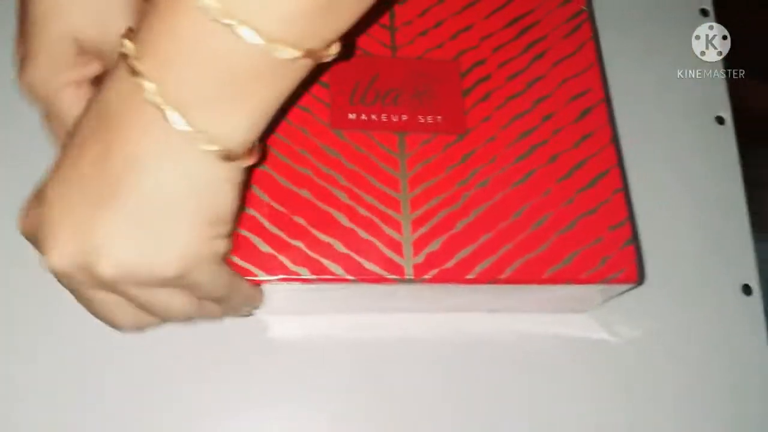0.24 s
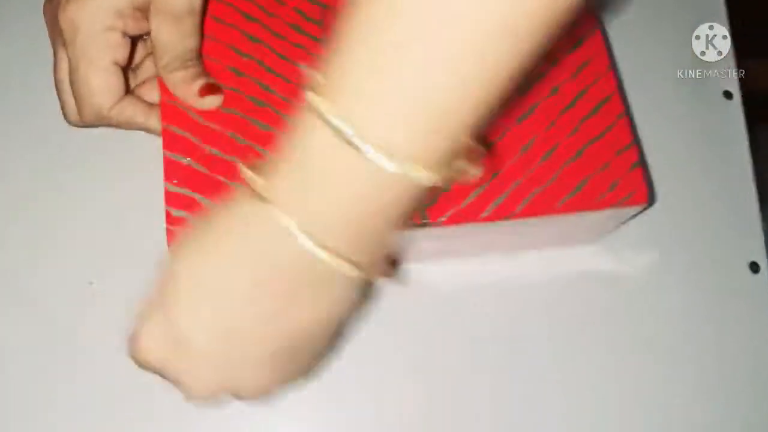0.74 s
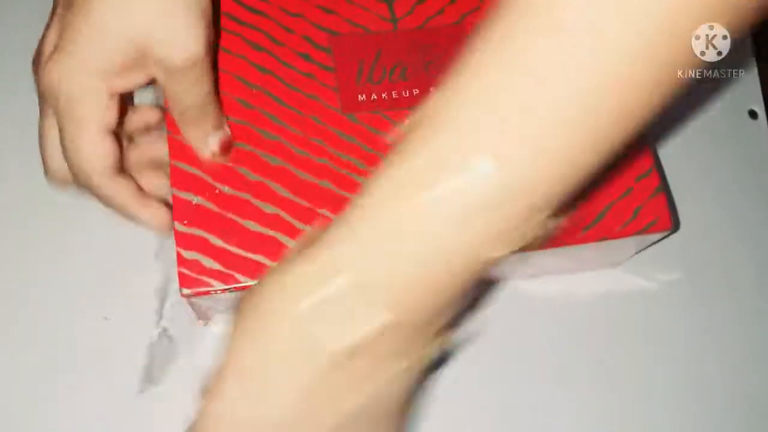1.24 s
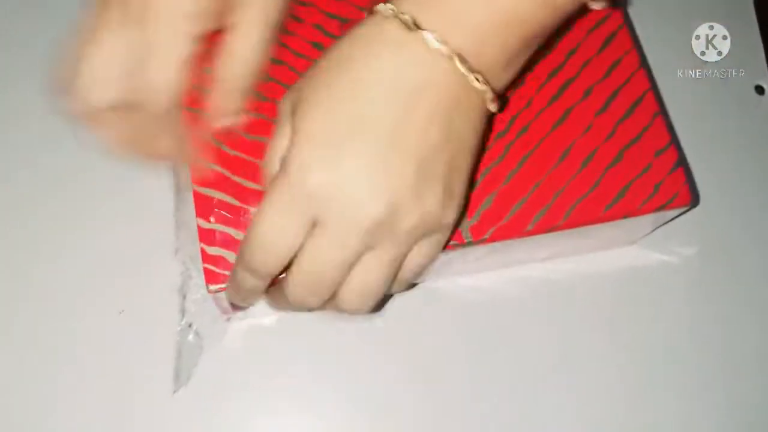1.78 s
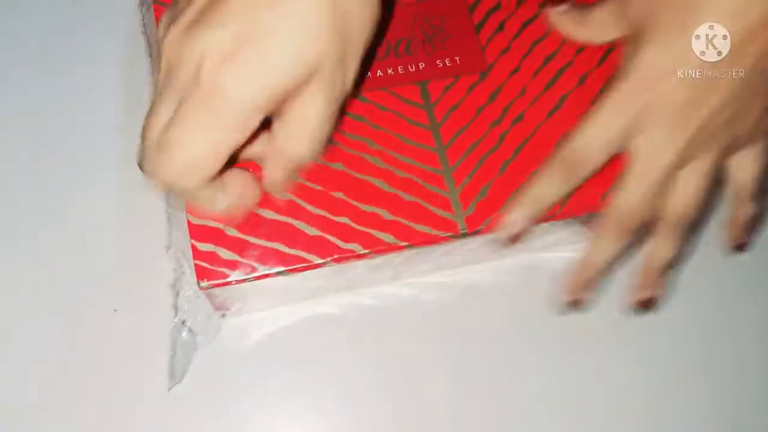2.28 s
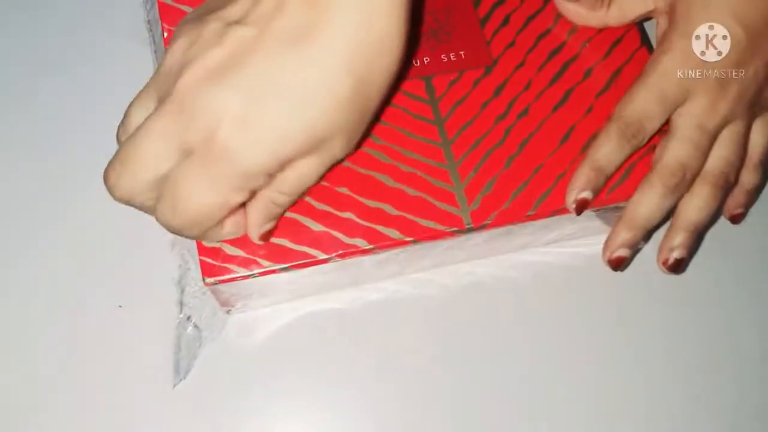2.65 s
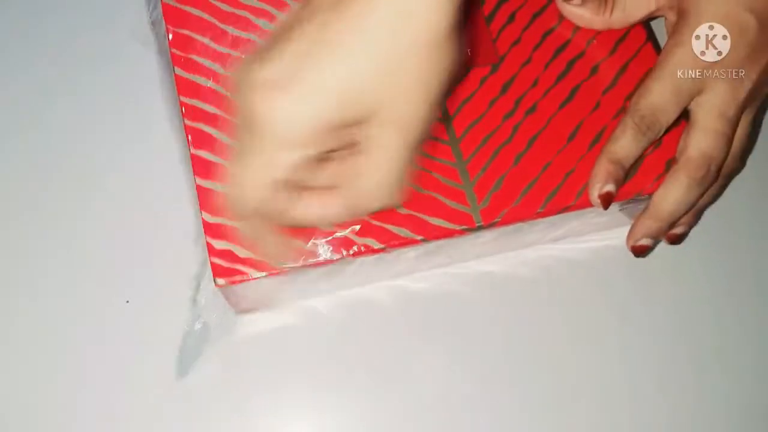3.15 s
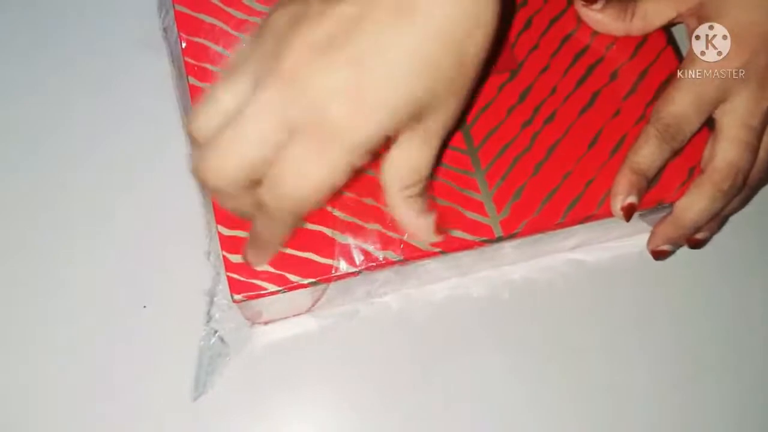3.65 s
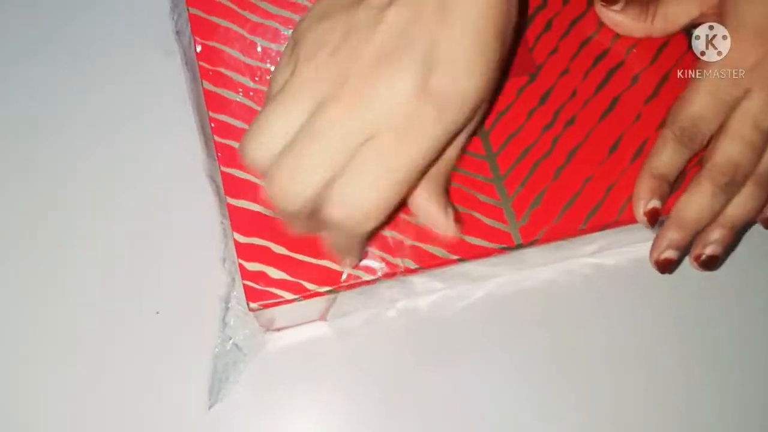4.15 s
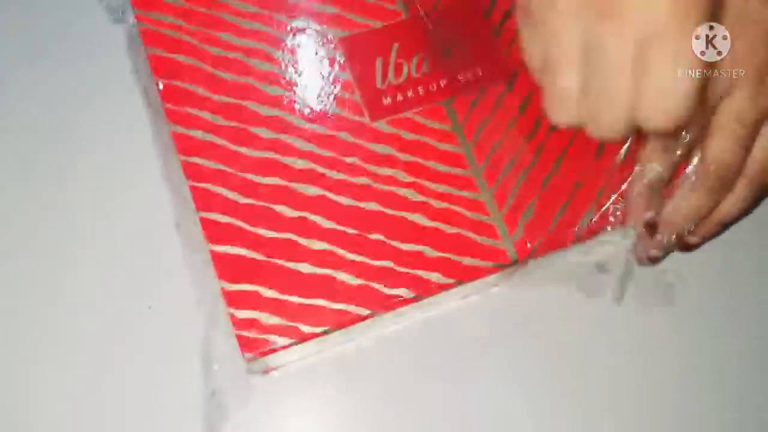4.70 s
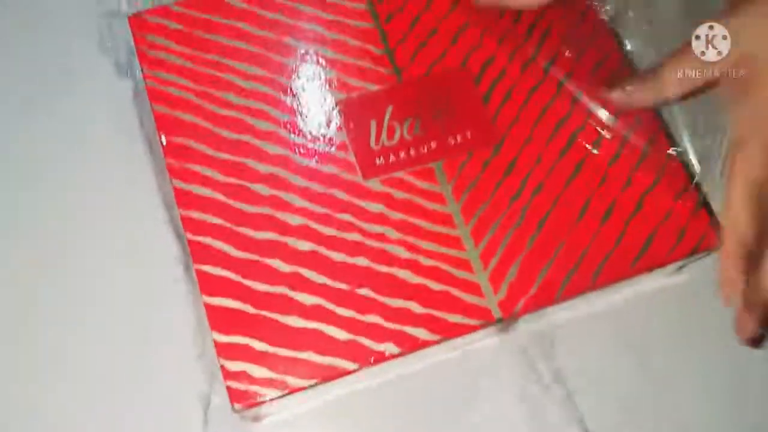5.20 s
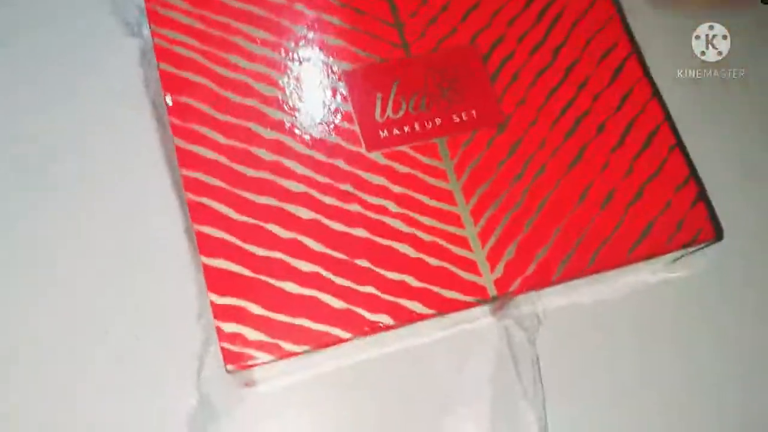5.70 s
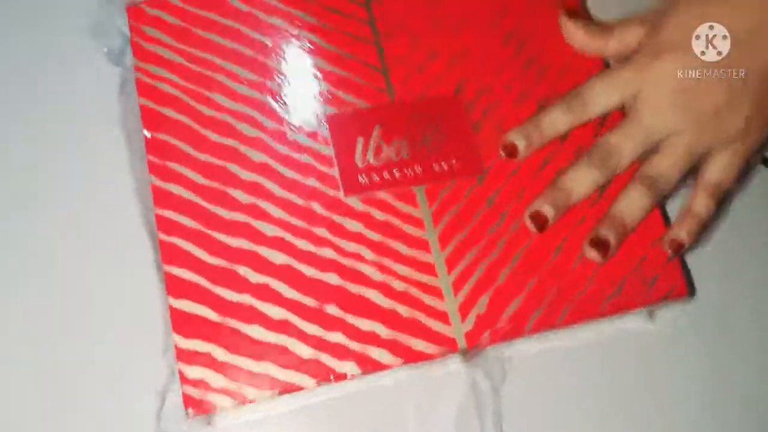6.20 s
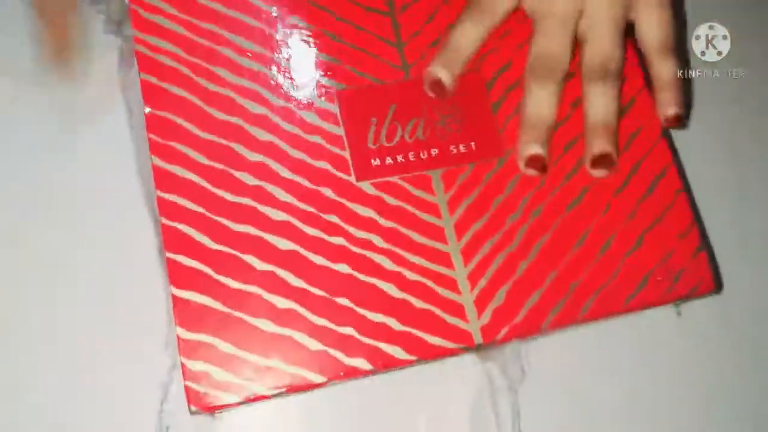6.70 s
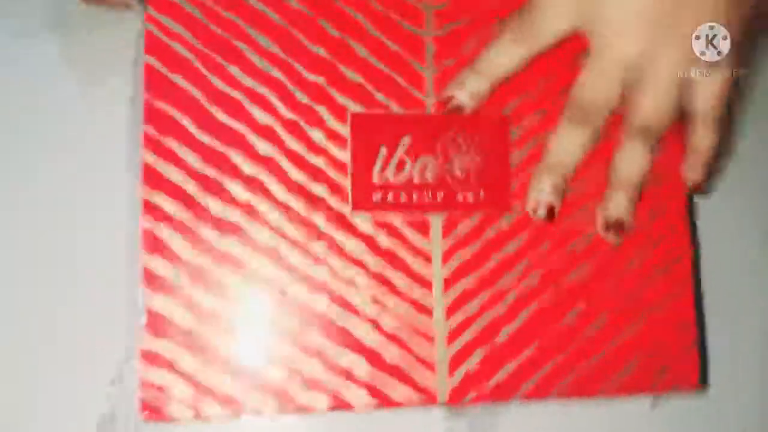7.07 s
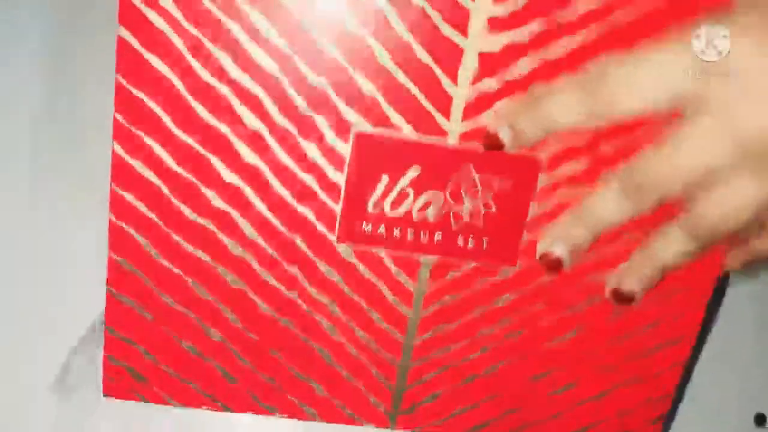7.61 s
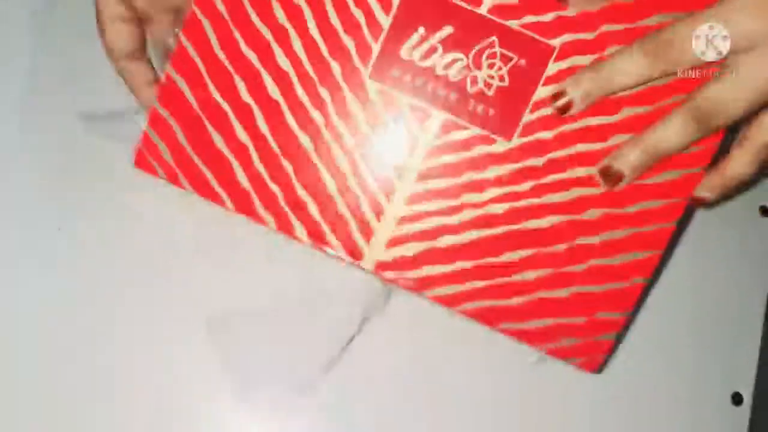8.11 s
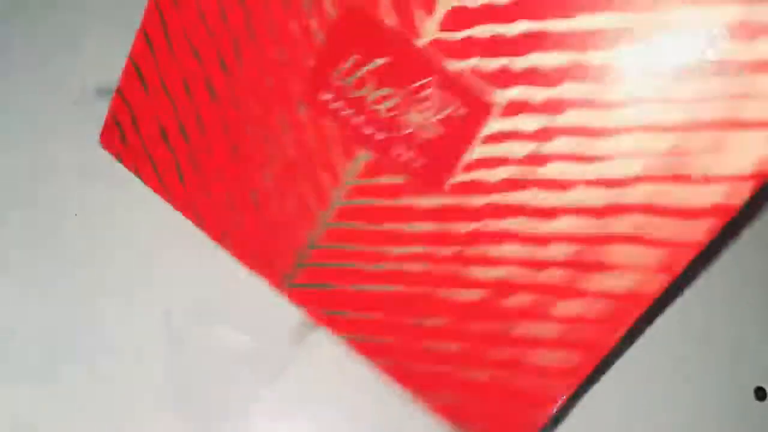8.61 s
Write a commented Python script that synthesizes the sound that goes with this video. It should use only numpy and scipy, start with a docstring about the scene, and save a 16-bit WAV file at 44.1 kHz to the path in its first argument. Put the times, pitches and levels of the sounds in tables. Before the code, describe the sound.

Close, crackly plastic film is picked at and peeled off a cardboard box, with soft hollow thuds and a few raps on the table.

```python
"""On a table in a small room, clear plastic wrap is picked at, torn and pulled off a cardboard box.
A two-microphone phone is close by. The film buckles in swarms of tiny noisy clicks, with a soft rub of noise.
Louder single snaps are a burst of noise with a short ring. Pushes on the hollow box are damped swings,
and raps of its edge on the table are swings that slow down.
The room answers with fading noise tails, over still air (shaped noise) and a faint motor hum (sines)."""
import sys
import numpy as np
from scipy import signal
from scipy.fft import rfft, irfft, next_fast_len
from scipy.io import wavfile
from scipy.ndimage import map_coordinates

SR = 44100
rng = np.random.default_rng(int(sys.argv[2]) if len(sys.argv) > 2 else 0)


def to_wav(sig):
    """Store sig (one row per channel, or 1-D mono) as 16-bit WAV at the path in sys.argv[1].

    Samples outside -1..1 are clipped; the rate is SR.
    """
    pcm = np.clip(np.atleast_2d(sig), -1, 1) * 32767
    pcm = np.round(pcm).astype(np.int16)
    wavfile.write(sys.argv[1], SR, pcm.T)  # frames by channels


N = 390285


def amp(db):
    """Turn decibels into a plain gain."""
    return 10 ** (np.asarray(db) / 20)


def unit(x):
    """Scale to an rms (average strength) of 1."""
    return x / np.sqrt(np.mean(x ** 2) + 1e-20)


def along(points, hz):
    """Read a curve of (Hz, value) points, with pitch on a log axis."""
    f, v = np.transpose(points)
    return np.interp(np.log(hz + 1), np.log(f + 1), v)


def wobble(rate):
    """A smooth random curve through rate random points a second."""
    knots = rng.standard_normal(int(N * rate / SR) + 4)
    return map_coordinates(knots, [np.arange(N) * rate / SR])


def filtered(x, response):
    """Filter x by a gain (it may be complex) that depends on frequency."""
    m = next_fast_len(x.shape[-1] + SR // 2)  # silence added so that the end does not wrap to the start
    spectrum = rfft(x, m) * response(np.fft.rfftfreq(m, 1 / SR))
    return irfft(spectrum, m)[..., :x.shape[-1]]


def causal(points):
    """A filter with the given (Hz, dB) colour that never sounds ahead of its input (minimum phase)."""
    def response(hz):
        cepstrum = irfft(np.log(amp(along(points, hz))))
        # fold the second half onto the first
        cepstrum[1:len(cepstrum) // 2] *= 2
        cepstrum[len(cepstrum) // 2 + 1:] = 0
        return np.exp(rfft(cepstrum))
    return response


def diffuse(pair):
    """Mix two unrelated signals: long bass waves are alike on both sides, short treble waves are not."""
    # left-right likeness of sound from all around: pitch_hz [Hz], likeness [1 = the same on both sides]
    likeness = [(100, 0.99), (500, 0.54), (1400, 0.5), (15000, 0.055)]
    turn = lambda hz: np.arccos(np.clip(along(likeness, hz), -1, 1)) / 2
    mid, side = filtered(pair, lambda hz: np.array([np.cos(turn(hz)), np.sin(turn(hz))]))
    return np.array([mid + side, mid - side])


def place(shapes, s, pan_db, lag):
    """Add short waveforms at times s, pan_db louder on the left and lag samples later there."""
    out = np.zeros((2, N))
    for side, sign in enumerate((1, -1)):  # left, right
        first = np.round(s * SR + (sign > 0) * lag).astype(int)
        at = first[:, None] + np.arange(shapes.shape[1])
        gain = amp(sign * pan_db / 2)[:, None]
        out[side] = np.bincount(np.clip(at, 0, N).ravel(), (shapes * gain).ravel(), N + 1)[:N]
    return out


def background():
    """Still room air is shaped noise; the motor hums at multiples of its steady speed."""
    # colour of the air, relative: pitch_hz [Hz], level_db [dB per Hz]
    air_colour = [(20, -44), (90, -17), (310, -16), (440, -17), (620, -25.5), (2400, -36.5), (15500, -41)]
    # motor tones: multiple [times the motor speed], level_db [dB rms, before a slow waver]
    hum_tones = [(6, -63), (8, -68), (9, -75)]
    air_db, motor_hz = -61, 48.45
    noise = rng.standard_normal((2, N))
    air = unit(diffuse(filtered(noise, lambda hz: amp(along(air_colour, hz)))))
    turn = 2 * np.pi * motor_hz * np.arange(N) / SR
    hum = 0
    for k, db in hum_tones:
        waver_db = wobble(2.57)
        hum = hum + np.sqrt(2) * amp(db + waver_db) * np.sin(k * turn + k * k)
    return amp(air_db) * air + hum


def room(x):
    """Each frequency dies at its own speed; a fresh tail for every short stretch, as the hands move about."""
    # how long the room rings: pitch_hz [Hz], fade_s [s to fall 60 dB]
    fade_times = [(100, 0.8), (300, 0.39), (1000, 0.29), (13000, 0.25)]
    out, step = np.zeros((2, N + SR)), SR // 4
    for at in range(0, N, step):
        hz, t, z = signal.stft(rng.standard_normal((2, SR // 2)), SR, nperseg=256)
        fade = amp(-60 * t / along(fade_times, hz)[:, None])
        tail = signal.istft(z * fade, SR, nperseg=256)[1]
        wet = signal.fftconvolve(x[None, at:at + step], tail / np.linalg.norm(tail[0]), axes=1)
        out[:, at + 150:][:, :wet.shape[1]] += wet  # the answer starts 150 samples late
    return diffuse(out[:, :N])


def raps():
    """The box edge raps the table: a dry bending wave whose high pitches arrive first, so the swing slows down."""
    # raps on the table: start_s [s], level_db [dB at the start, before panning and filter]
    rap_list = [(4.417, -28.5), (4.605, -16.5), (4.6394, -18), (4.9498, -15), (4.963, -16.5), (5.0288, -24),
                (5.0519, -21)]
    half_swing_s, life_s = .0015, 0.01  # first half swing, later ones stretch; time to decay to 37 %
    s, db = np.transpose(rap_list)
    t = np.arange(SR // 10) / SR
    wave = -np.cos(np.pi * np.sqrt(t / half_swing_s)) * np.exp(-t / life_s)
    blows = place(amp(db)[:, None] * wave, s, 6 * rng.standard_normal(len(s)), 0 * s)
    # lift the treble, from 250 Hz up to 700 Hz
    return filtered(blows, lambda hz: (1 + 1j * hz / 250) / (1 + 1j * hz / 700))


def knocks():
    """A soft push on the hollow box: a damped swing whose overtone dies first, and a loose shudder of the card."""
    # pushes on the box: start_s [s], level_db [dB, before gain and filter], pitch_hz [Hz of the thud]
    knock_list = [(0.4837, -19.5, 206), (0.8186, -25.5, 297), (1.111, -16, 198), (1.277, -34, 350),
                  (1.585, -38, 160), (1.7837, -33, 244), (2.377, -32.5, 202), (2.5, -41, 151),
                  (3.1413, -30, 177.6), (3.286, -24.5, 670), (3.584, -32.5, 344), (4.088, -34.5, 500),
                  (4.417, -24, 425), (4.622, -18.5, 170), (5.889, -22.5, 249), (5.95, -24, 198),
                  (6.069, -20, 650), (6.14, -22, 190), (8.0046, -15, 670), (8.146, -17.5, 236),
                  (8.3194, -23, 250), (8.4467, -22, 171), (8.8209, -17.5, 300)]
    swing_cycles, shudder_cycles = 1.25, 7  # cycles to decay to 37 %: the push, the loose card
    s, db, hz = np.transpose(knock_list)[:, :, None]
    turns = hz * np.arange(SR // 4) / SR
    swing = -np.cos(2 * np.pi * turns) * np.exp(-turns / swing_cycles)
    overtone = 0.37 * np.sin(2 * np.pi * 2.7 * turns) * np.exp(-turns)
    shudder = 1.5 * rng.standard_normal(turns.shape) * np.exp(-turns / shudder_cycles)

    def card(f):
        """The card answers most strongly around the pitch of its thud."""
        resonance = 1 / (1 - (f / hz) ** 2 + .9j * f / hz)
        return np.sqrt(230 / hz) * resonance * (1 + .6j * f / hz)

    shudder = filtered(shudder, card)
    soft_start = 1 - np.exp(-turns / .45)
    shapes = 1.6 * amp(db) * (swing + overtone + shudder) * soft_start
    push = place(shapes, s[:, 0], 6 * rng.standard_normal(len(s)), 0 * s[:, 0])
    return filtered(push, causal([(20, -22), (60, -6.5), (600, 3), (2500, -5), (15000, -56)]))


def snaps():
    """One crease runs across the film: a ragged crack of a few ms, and the taut patch rings for a few cycles.
    Also returns the crack averaged over all directions, a plain click with the ring, which the walls receive."""
    # single snaps: start_s [s, start of the ring], level_db [dB, before mix and filter], pitch_hz [Hz of the ring]
    snap_list = [(0.1033, -28, 2060), (0.2019, -26, 1500), (0.325, -17, 4730), (0.4837, -11, 5950),
                 (0.604, -14, 2090), (0.62, -16, 2070), (0.8184, -13, 4500), (0.904, -16.5, 6500),
                 (0.93, -13, 7700), (1.037, -18.5, 6400), (1.1015, -9.5, 6700), (1.306, -27.5, 12700),
                 (1.5881, -19, 10700), (1.61, -23.5, 7200), (1.6698, -27.5, 11500), (1.731, -16, 8900),
                 (1.8716, -23.5, 11070), (2.021, -24, 11000), (2.1281, -25, 8000), (2.167, -29, 7100),
                 (2.27, -32, 7950), (2.4698, -28.5, 7950), (2.5005, -23.5, 8000), (2.5103, -24, 7800),
                 (2.7334, -25, 7300), (2.9687, -31, 6800), (3.013, -13.5, 5750), (3.06, -15, 8000),
                 (3.0776, -11.5, 7900), (3.1184, -11, 7200), (3.1882, -14, 11200), (3.272, -11, 7200),
                 (3.2867, -13, 7760), (3.584, -37, 2500), (3.7823, -24, 4500), (3.8546, -11, 4440),
                 (3.8703, -16.5, 3990), (3.9186, -20.5, 7560), (4.001, -18.5, 6860), (4.0155, -19, 7400),
                 (4.0185, -18, 7500), (4.0274, -19.5, 1900), (4.0734, -19, 1883), (4.2416, -19, 10600),
                 (4.298, -24, 9000), (4.369, -15.5, 7500), (4.417, -9.5, 6900), (4.4504, -13.5, 7300),
                 (4.51, -11.5, 1960), (4.5323, -17.5, 1980), (4.554, -19, 1900), (4.8694, -11.5, 8180),
                 (4.95, -11.5, 3720), (5.029, -11, 6700), (5.051, -13.5, 2600), (5.1507, -19, 3120),
                 (5.2454, -23.5, 2700), (5.3437, -11, 4900), (5.6417, -19.5, 2530), (5.952, -13, 2720),
                 (6.0696, -12, 3450), (6.097, -13.5, 1510), (6.1422, -13, 3002), (6.736, -19.5, 2860),
                 (6.8853, -19, 7000), (6.939, -14, 4900), (6.986, -16.5, 1570), (7.058, -20.5, 2620),
                 (7.126, -20.5, 12300), (7.2375, -22.5, 1810), (7.2681, -19.5, 2100), (7.3009, -15, 2650),
                 (7.3364, -18.5, 2680), (7.4038, -13, 2770), (7.468, -19, 4750), (7.4824, -15, 4740),
                 (7.664, -13.5, 1670), (8.005, -16, 2080), (8.2626, -22.5, 4110), (8.41, -19.5, 4500),
                 (8.653, -16.5, 1830), (8.7912, -20, 3010)]
    s, db, hz = np.transpose(snap_list)
    t = np.arange(500) / SR
    u = rng.random((len(s), 2))
    late = np.maximum(t - .001, 0)  # the patch lets go 1 ms into the crack
    ring = np.sin(2 * np.pi * hz[:, None] * late) * np.exp(-late * hz[:, None] / 2.4)
    run = (t / .0009) ** 2 * np.exp(-t / .0009)  # the crack swells and fades
    noise = rng.standard_normal((len(s), len(t)))
    dull = np.clip(0.58 * np.log2(4000 / hz), -1, 1)[:, None]  # a wide crease rings low and cracks dull
    colour = lambda x: (x + dull * np.roll(x, 1, axis=1)) / np.sqrt(1 + dull ** 2)
    crack = run * colour(noise)
    crack = .62 * amp(db)[:, None] * crack / np.abs(crack).max(axis=1)[:, None]
    ring = .42 * amp(db)[:, None] * ring
    click = colour(1. * (t == 0)[None])
    plain = .35 * ring + np.linalg.norm(crack, axis=1)[:, None] * click
    direct = place(ring + crack, s - .001, 5 * (u[:, 0] - .5), 24 * (u[:, 1] - .5))
    to_walls = place(plain, s, 0 * s, 0 * s)[:1]
    both = np.vstack([direct, to_walls])
    both = filtered(both, causal([(300, -12.5), (1500, 11.5), (6000, 11), (15000, 8.5)]))
    return both[:2], both[2]


def tugs():
    """Strength of the pull in dB: every tug swells to its height and fades, and neighbours overlap."""
    # tugs at the film: peak_s [s], level_db [dB at the height], swell_s [s to swell 20 dB], fade_s [s to fade 20 dB]
    tug_list = [(.095, -41, 0.09, 0.16), (.327, -41, 0.14, 0.26), (.488, -26, 0.0342, 0.12),
                (.634, -31, 0.13, 0.1556), (.84, -32, 0.02, 0.37), (1.105, -28.5, 0.04, 0.056),
                (1.585, -32, 0.07, .04), (1.739, -42, 0.08, 0.05), (1.885, -51, 0.0351, 0.18),
                (2.128, -47, 0.16, 0.135), (2.34, -58, 0.17, 0.28), (2.516, -42, 0.1, 0.01),
                (2.615, -38, 0.12, 0.01), (2.735, -40, 0.07, 0.0146), (3.03, -36, 0.0264, 0.16),
                (3.19, -24, .2, 0.0853), (3.286, -21, 0.0351, 0.0434), (3.71, -44, 0.05, 0.12),
                (3.855, -31, 0.1546, 0.11), (4.04, -40, 0.11, 0.04), (4.287, -39, 0.12, 0.04),
                (4.39, -34, 0.02, .25), (4.645, -27, 0.11, 0.1851), (4.82, -35, 0.07, 0.18),
                (4.92, -29, 0.08, 0.0235), (5.01, -28, 0.16, 0.11), (5.156, -35, .1, 0.09),
                (5.32, -31, .015, 0.2649), (5.49, -28, 0.26, 0.1765), (5.646, -39, 0.03, 0.14),
                (5.86, -40, 0.23, 0.24), (5.955, -29, 0.0253, .12), (6.1, -23, .045, 0.1681),
                (6.36, -52, .2, 0.22), (6.75, -41, 0.22, 0.29), (6.99, -35, 0.41, 0.15),
                (7.26, -34, 0.21, 0.11), (7.42, -31, 0.05, 0.24), (7.64, -29, 0.42, 0.43),
                (8.02, -25, 0.0747, 0.2739), (8.33, -34, 0.41, 0.4146), (8.85, -32, .5, .1)]
    roundness, slack_db = 1.5, -80  # power of time in swell and fade; the film left alone
    now = np.arange(N // 32 + 2) * 32 / SR  # every 32nd sample is enough
    power = amp(2 * slack_db)
    for s, db, swell, fade in tug_list:
        away = np.where(now < s, (s - now) / swell, (now - s) / fade)
        power = power + amp(2 * (db - 20 * away ** roundness))
    return np.interp(np.arange(N) / SR, now, 10 * np.log10(power))


def crinkle():
    """The film gives way in jerks: clumps of buckling clicks, packed denser by a harder pull.
    Each click sounds both as a fine crease and as a duller, broader fold."""
    # balance as the film bunches up: time_s [s], level_db [dB of broad folds over fine creases]
    bunching = [(0, 3), (.4, -4.5), (1.8, -6.5), (2.6, -15), (3.2, -6.5), (3.85, -9.5), (4.1, -6),
                (4.6, -2.5), (5.5, 2), (5.95, -1), (6.45, 5), (7.0, 0), (8.5, 3), (8.85, 1)]
    # colour of fine creases, relative: pitch_hz [Hz], level_db [dB]
    fine_colour = [(1300, -28), (2050, -2), (3100, -4), (4500, 3.5), (6500, 1), (8700, -3), (11000, 1.5),
                   (15500, -4.5)]
    # colour of broad folds, relative: pitch_hz [Hz], level_db [dB]
    broad_colour = [(30, -28), (60, -11.5), (150, -5), (540, -8), (690, 0.5), (900, -4), (1330, -2),
                    (1510, 2.4), (1750, 0.5), (2600, 2), (4500, -8), (9000, -58)]
    fine_db = tugs()
    broad_db = fine_db + np.interp(np.arange(N) / SR, *np.transpose(bunching))
    busy = amp(.78 * np.maximum(fine_db, broad_db))
    busy = busy / busy.mean()

    # 650 clicks a second on average, gathered into clumps by a quick random wobble
    flow = np.cumsum(busy * amp(6.5 * wobble(110)))
    u = rng.random((round(650 * N / SR), 7))
    at = np.searchsorted(flow, u[:, 0] * flow[-1]) / SR

    samples = np.arange(220)
    t = samples / SR / (0.00061 * (0.29 + u[:, 2:3]))  # time in units of each click's own length
    size = amp(4.7 * np.minimum(-np.log(u[:, 1:2]), 3.1))  # many small clicks, few big ones
    # each buckling patch has its own size, so its own pitch
    pitch = np.cos(2 * np.pi * 1300 * 4.5 ** u[:, 6:] * samples / SR)
    rubbing = 0.55 * amp(np.minimum(broad_db - fine_db, 0))  # bunched film also slides over itself
    fine_share = u[:, 5:6]
    film = 0
    for db, colour, share in ((fine_db, fine_colour, fine_share), (broad_db, broad_colour, 1 - fine_share)):
        body = rng.standard_normal(t.shape) + .45 * pitch
        shapes = size * (0.3 + share) * body * t * np.exp(-t)
        clicks = place(shapes, at, 8 * (u[:, 3] - .5), 30 * (u[:, 4] - .5))
        # even out the loudness that comes from denser clicks; db sets it below
        clicks = unit(filtered(clicks, causal(colour)) / np.sqrt(busy))
        rub = unit(diffuse(filtered(rng.standard_normal((2, N)), causal(colour))))
        film = film + amp(db) * (clicks + rubbing * rub)
    return film


def scene():
    """Film and box near the phone, with the room's answer."""
    rustle = amp(0.7) * crinkle()
    cracks, spread = snaps()
    box = knocks()
    send = amp(-8.5) * (rustle[0] + spread) + amp(-12) * box[0]  # what the walls receive
    return rustle + cracks + box + raps() + room(send) + background()


def record(dry):
    """The two microphones differ in colour; the phone keeps nothing above its band limit."""
    # left microphone against the right: pitch_hz [Hz], level_db [dB louder on the left]
    left_over_right = [(40, 1), (600, 0), (1400, -3.5), (10000, 0)]
    top_hz = 16700
    heard = filtered(dry, lambda hz: amp(np.outer([.5, -.5], along(left_over_right, hz))))
    # from 15.5 kHz the treble drops 4 dB every 100 Hz, down to -36 dB
    slope = lambda hz: amp(-4 * np.clip(hz / 100 - 155, 0, 9))
    return filtered(heard, lambda hz: slope(hz) * (hz < top_hz))


dry = scene()
out = record(dry)
to_wav(out)
```